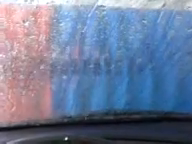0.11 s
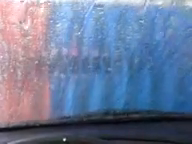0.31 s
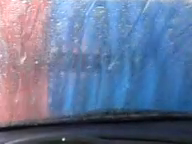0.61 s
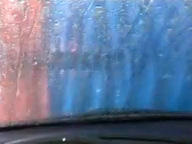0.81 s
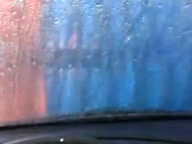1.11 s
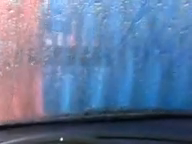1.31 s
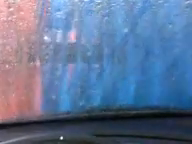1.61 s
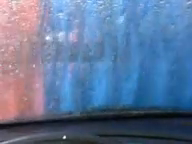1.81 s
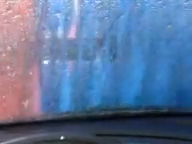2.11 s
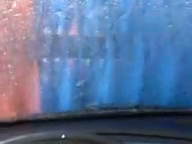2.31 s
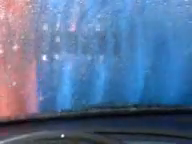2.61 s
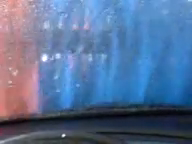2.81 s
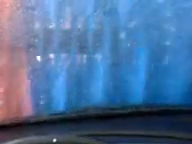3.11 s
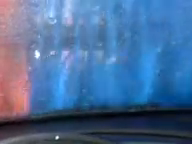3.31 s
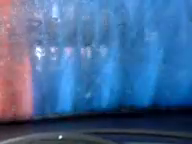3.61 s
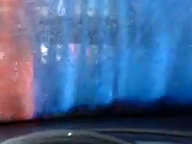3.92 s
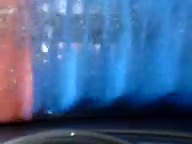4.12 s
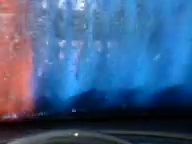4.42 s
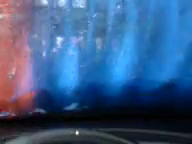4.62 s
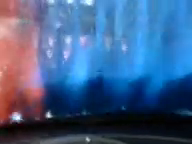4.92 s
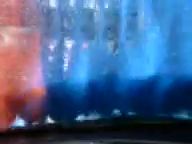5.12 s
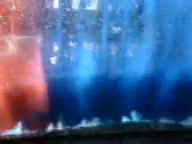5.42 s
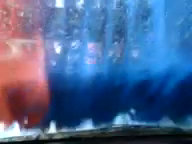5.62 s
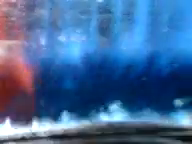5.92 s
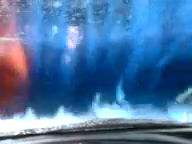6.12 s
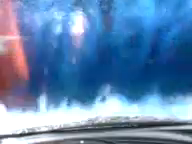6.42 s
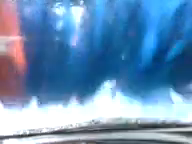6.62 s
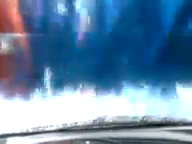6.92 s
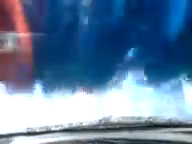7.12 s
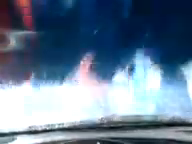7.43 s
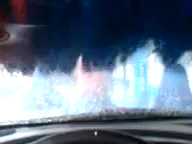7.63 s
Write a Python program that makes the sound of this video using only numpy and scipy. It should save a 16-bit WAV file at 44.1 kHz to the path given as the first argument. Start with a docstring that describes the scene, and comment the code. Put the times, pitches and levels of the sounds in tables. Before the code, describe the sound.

Heard from inside a car in an automatic wash: steady water spray roars softly with a patchy fizz, swelling as the brush approaches. Before the middle, spinning cloth strips suddenly hit the windscreen with a cluster of hard slaps, then drum in a loud, rapid flutter. The brush climbs the glass and eases slightly. The microphone is dull, narrow-band and overloaded.

```python
"""Inside a car in an automatic wash: spray roars and fizzes on the body, then a spinning cloth brush lands
on the windscreen and climbs it, its rows of strips drumming on the glass with single hard slaps on top.
Brush and spray are coloured noise with patches and drops; each slap is a decaying pair of noise bands.
All of it passes a narrow-band microphone whose converter overloads."""
import sys
import numpy as np
from scipy import signal
from scipy.io import wavfile
from scipy.ndimage import uniform_filter1d

SR = 44100
rng = np.random.default_rng(int(sys.argv[2]) if len(sys.argv) > 2 else 0)


def put_to_file(sound):
    """Save the sound as 16-bit audio at rate SR, in the file named by the first command-line argument."""
    columns = np.atleast_2d(sound).T  # one column per channel
    safe = np.clip(columns, -1, 1)
    whole_steps = np.round(safe * 32767)
    wavfile.write(sys.argv[1], SR, whole_steps.astype(np.int16))


N = 344862
LANDS_S = 3.67  # the brush reaches the glass

# Rows of strips: rate, lead in row spacings, and a slight slowing near the end.
ROWS_PER_S, BEAT_LEAD_ROWS = 29.2, 0.16
SLOWS_S, SLOWER_ROWS_PER_S = 6.63, 0.4
TIMING_SPREAD_ROWS, STRENGTH_SPREAD_DB = .1, 1.83


def row_beat():
    """Rows pass at the brush's turning rate; uneven strips shift each row's timing and strength."""
    t = np.arange(N) / SR
    early, strong = rng.standard_normal((400, 2)).T
    turn = ROWS_PER_S * t + BEAT_LEAD_ROWS - SLOWER_ROWS_PER_S * np.maximum(t - SLOWS_S, 0)
    turn += TIMING_SPREAD_ROWS * np.interp(turn, np.arange(400), early)
    row = np.floor(turn + .5).astype(int)
    strength_db = STRENGTH_SPREAD_DB * uniform_filter1d(strong[row], size=200)  # soft steps between rows
    return turn, strength_db


# Colours of the five brush layers, low to high: filter curves (f/Hz, level/dB)
BOOM = [(25, -50), (60, -19.5), (140, -18), (190, -8.5), (225, -12), (300, -2.5), (400, 0.5), (480, -6),
        (700, -24)]
EDGE = [(300, -29.5), (460, -5.5), (520, -1), (590, -2), (700, -13.5), (1000, -35)]
PANE = [(350, -37.5), (560, -8), (635, 0.5), (700, -2.5), (760, -1.5), (900, -8.5), (1300, -20.5)]
SWISH = [(500, -25), (900, 0.5), (1100, -1.5), (1400, -1.5), (1900, -12), (3300, -9.5), (5000, -17.5)]
SCRUB = [(1000, -36), (1500, -5.5), (1950, 3), (2500, -1), (3000, -5), (3300, -11), (5000, -9)]
# Balance of the layers, in the same order:
# (level at the climb/dB, drift before/dB per s, step over it/dB, drift after/dB per s, pressure share 0-1)
LAYERS = [(-15, 0.05, 0.26, -0.9, 1), (-24.5, -4.5, -1.5, 1.26, 0.8), (-17.5, -1, 5, -1.07, 0.97),
          (-17.5, 2.3, -3, 2, 0.74), (-12.5, 2, -9.5, -3, 1)]
# Movement of the layers, in the same order: (share of the beat 0-1, patchiness/dB, flicker/dB)
MOTION = [(0.145, 0.935, -0.74), (0.391, 1.194, 1.1), (0.508, 1.497, 0.4), (.6, 2.2, 0.2),
          (0.898, 3.202, 1.5)]
# Pressure of the brush on the glass: (t/s, level/dB before each layer's share, extra scrub level/dB)
PRESSURE = [(3.67, -17, 1), (3.78, -7.5, -0.5), (3.9, -4, 0), (4.05, -2, -0.5), (4.2, -1, 0),
            (4.4, 0.5, 0.5), (4.6, -0.5, -0.2), (4.8, -1.1, 2.5), (5.0, -0.8, 0.3), (5.2, -0.6, -0.5),
            (5.55, -0.5, -3.4), (5.9, -1.5, -1), (6.3, -2.5, 1), (6.45, -3.5, -1), (6.9, -4.5, 1),
            (7.15, -6.5, 1.5), (7.6, -6, -2), (7.82, -4.5, .1)]
LAND_RAMP_S = .006
CLIMB_S, CLIMB_TAKES_S = 5.26, 0.096  # the brush leaves the lower edge for the open pane
# The beat is deepest on landing and blurs around the climb.
BEAT_DEPTH, LANDING_DEPTH, SETTLE_S, BLUR_S = 0.41, .55, 0.26, 0.27


def brush():
    """Wet strips drum on the glass in rows; the light treble layers follow the beat more than the boom."""
    t = np.arange(N) / SR
    since = t - CLIMB_S
    climbed = ramp(CLIMB_S - CLIMB_TAKES_S / 2, CLIMB_TAKES_S)
    depth = BEAT_DEPTH * (1 - np.exp(-(since / BLUR_S) ** 2))
    depth += LANDING_DEPTH * np.exp(-abs(t - LANDS_S) / SETTLE_S)
    turn, strength_db = row_beat()
    pressure_db, scrub_db = columns(PRESSURE)
    out = np.zeros(N)
    for balance, colour, motion in zip(LAYERS, (BOOM, EDGE, PANE, SWISH, SCRUB), MOTION):
        db, before_db, step_db, after_db, follow = balance
        share, patchy_db, flicker_db = motion
        drift_db = np.where(since < 0, before_db, after_db) * since
        level_db = db + drift_db + step_db * climbed + follow * pressure_db
        if colour is SCRUB:
            level_db = level_db + scrub_db
        beat = np.clip(1 + share * depth * np.cos(2 * np.pi * turn), .05, 2)
        beat *= gain_of(share * strength_db)
        drumming = beat * patter(patchy_db, flicker_db, 1500, -16.5)
        out += gain_of(level_db) * evened(coloured(drumming, colour))
    return ramp(LANDS_S, LAND_RAMP_S) * out


# Single hard slaps of a strip, levels before the rise and decay:
# (t/s, thud level/dB, thud f/Hz, crack level against the thud/dB, crack f/Hz)
SLAPS = [(3.691, -7, 681, -2.5, 1646), (3.728, -3.5, 990, -12, 1850), (3.758, -4.5, 595, -18, 1630),
         (3.789, -4, 400, -3, 2180), (3.802, -2, 414, -17, 1880), (3.829, -3.5, 550, -13, 1600),
         (3.863, -5, 470, -7.5, 2870), (3.894, -3, 480, -12, 2200), (3.921, -4.5, 636, -22, 2640),
         (4.093, -2, 432, -10, 1700), (4.205, -0.5, 537, -6.5, 2630), (4.372, 0, 704, -4.5, 2210),
         (4.637, -8, 412, -6, 2260), (4.946, -4, 660, 4, 2390), (5.391, -15, 610, -16, 1950),
         (5.696, -9, 630, -21, 1760), (5.984, -8.5, 633, -2, 1770), (6.84, -19, 431, -15, 1630)]
SLAP_T60_S, SLAP_RISE_S = 0.036, 0.0024  # 60 dB decay time, time constant of the rise


def slap_band(noise, hz):
    """Noise resonating around one frequency, as a struck surface does."""
    points = [(hz / 6, -24.), (hz / 1.2, -7.), (hz, 0), (hz * 1.36, -7.), (hz * 6, -24.)]
    return evened(coloured(noise, points))


def slaps():
    """A strip hits in a short burst of noise: the thud of the glass and the crack of wet cloth."""
    out, t = np.zeros(N), np.arange(3000) / SR
    noises = rng.standard_normal((len(SLAPS), 2, len(t)))
    rise = 1 - np.exp(-t / SLAP_RISE_S)  # the strip lands along its length
    for (s, db, thud_hz, crack_db, crack_hz), (thud_noise, crack_noise) in zip(SLAPS, noises):
        thud, crack = slap_band(thud_noise, thud_hz), slap_band(crack_noise, crack_hz)
        shape = gain_of(db - 60 * t / SLAP_T60_S) * rise
        add(out, s, shape * (thud + gain_of(crack_db) * crack))
    return out


# Colour of the spray heard in the car: filter curve (f/Hz, level/dB)
WASH_COLOUR = [(25, -35.5), (59, -24.5), (108, -19), (176, -10.5), (235, -12), (283, -2), (340, -1),
               (400, -1), (463, -7.5), (620, -7), (1100, -12), (1230, -11.5), (1450, -16.5), (1870, -14),
               (2500, -17), (3300, -23), (5000, -24)]
# Level and fizz balance creep up until the brush lands.
SPRAY_DB, SPRAY_CREEP_DB_PER_S, FIZZ_DB, FIZZ_CREEP_DB_PER_S = -25, 0.2367, -3., 0.78
NEAR_FROM_S, NEAR_DB = 2.83, 4  # the spray swells as the brush comes near
SWELL_S, SWELL_WIDTH_S, SWELL_DB = 3.3, .17, 2  # a brief swell of the fizz


def wash():
    """Spray on the body: a steady roar below, patchy fizz above that grows as the brush comes near."""
    t = np.minimum(np.arange(N) / SR, LANDS_S)  # levels hold once the brush has landed
    near = ramp(NEAR_FROM_S, LANDS_S - NEAR_FROM_S)
    level_db = SPRAY_DB + SPRAY_CREEP_DB_PER_S * t + NEAR_DB * near
    swell_db = SWELL_DB * np.exp(-((t - SWELL_S) / SWELL_WIDTH_S) ** 2)
    fizz_db = FIZZ_DB + FIZZ_CREEP_DB_PER_S * t + swell_db
    low, high = (signal.butter(2, 700., kind, fs=SR) for kind in ("low", "high"))
    roar = signal.lfilter(*low, patter(.8, 0.18, 900, -13.5))
    fizz = signal.lfilter(*high, patter(3.13, 0.23, 900, -7.5))
    return gain_of(level_db) * evened(coloured(roar + gain_of(fizz_db) * fizz, WASH_COLOUR))


def patter(patchy_db, flicker_db, drops_per_s, drop_db):
    """Water as white noise in short narrow patches, a flicker shared by all bands, and single drops."""
    frames = N // 128 + 5
    real, imag, patches = rng.standard_normal((frames, 257, 3)).T  # each (band, frame)
    patches = uniform_filter1d(patches, size=2, axis=0)
    patches = evened(uniform_filter1d(patches, size=12, axis=1))
    flicker = evened(uniform_filter1d(rng.standard_normal(frames), size=5))
    spectrum = (real + 1j * imag) * gain_of(patchy_db * patches + flicker_db * flicker)
    hiss = evened(signal.istft(spectrum, nperseg=512, noverlap=384)[1][:N])
    chance, size, sign = rng.random((N, 3)).T
    heights = gain_of(-4. * np.log(size + 0.0096))  # many small drops, few large ones
    drops = (chance < drops_per_s / SR) * heights * np.sign(sign - .5)
    return hiss + gain_of(drop_db) * evened(drops)


def gain_of(db):
    """Decibels to a factor."""
    return 10 ** (np.asarray(db) / 20)


def evened(x):
    """Scales to rms 1."""
    return x / np.sqrt(np.mean(x ** 2) + 1e-20)


def columns(rows):
    """Each column of a timed table as a curve over all samples."""
    s, *values = np.transpose(rows)
    return [np.interp(np.arange(N) / SR, s, v) for v in values]


def ramp(start_s, takes_s):
    """Rises from 0 to 1 over a span of time."""
    return np.clip((np.arange(N) / SR - start_s) / takes_s, 0, 1)


def add(mix, s, sound):
    """Mixes a sound in at a time."""
    part = mix[round(s * SR):][:len(sound)]
    part += sound[:len(part)]


def coloured(x, points):
    """Causal minimum-phase filter with the given curve."""
    hz, db = np.transpose(points)
    grid = abs(np.fft.fftfreq(8192, 1 / SR))
    log_gain = np.log(gain_of(np.interp(np.log(grid + 1), np.log(hz), db)))
    response = np.exp(np.conj(signal.hilbert(log_gain)))  # the phase follows from the gain
    taps = np.fft.ifft(response).real[:4096]
    return signal.oaconvolve(x, taps)[:len(x)]


def scene():
    """Brush, slaps and spray, summed to one channel."""
    return (brush() + slaps() + wash())[None]


# Response of the narrow-band microphone: filter curve (f/Hz, level/dB)
MICROPHONE = [(20, 1.5), (3250, -0.5), (3500, -9.5), (4000, -21), (4350, -34), (4600, -68.5), (5000, -100)]
CONVERTER_LIMIT, CONVERTER_HZ = 0.764, 4450  # limit in full scale
CLIP_LEVEL, EDGE_HZ = .71, 15900  # later gain stage in full scale, final band limit


def lowpass(x, taps, hz):
    """Steep symmetric low-pass that adds no delay."""
    return signal.oaconvolve(x, signal.firwin(taps, hz, window=("kaiser", 9), fs=SR), "same")


def record(dry):
    """Narrow microphone band; its converter saturates, a later gain stage shaves the remaining peaks."""
    heard = coloured(dry[0], MICROPHONE)
    saturated = np.clip(heard, -CONVERTER_LIMIT, CONVERTER_LIMIT)
    smooth = lowpass(saturated, 801, CONVERTER_HZ)
    clipped = np.clip(smooth, -CLIP_LEVEL, CLIP_LEVEL)
    return lowpass(clipped, 511, EDGE_HZ)[None]


dry = scene()
out = record(dry)
put_to_file(out)
```